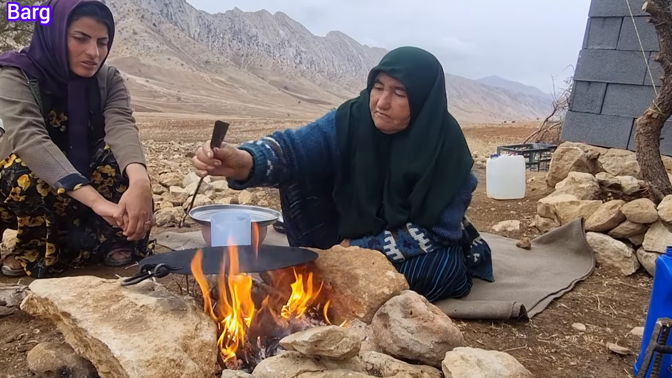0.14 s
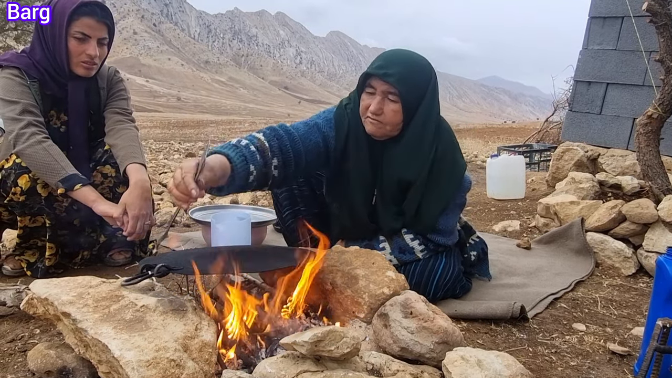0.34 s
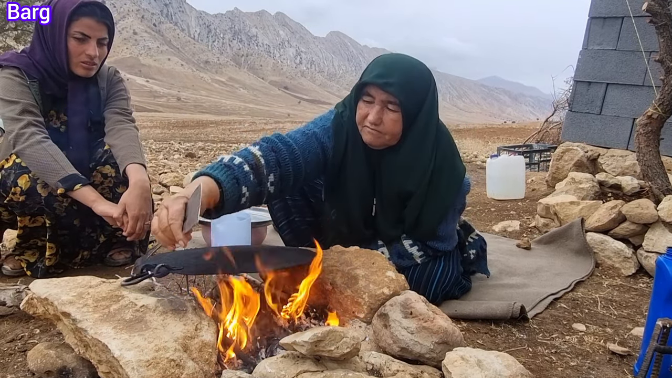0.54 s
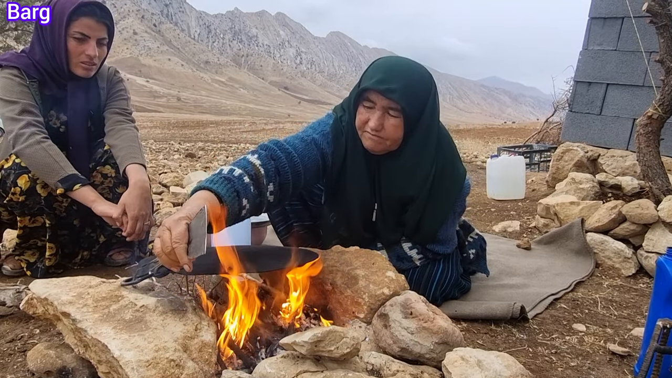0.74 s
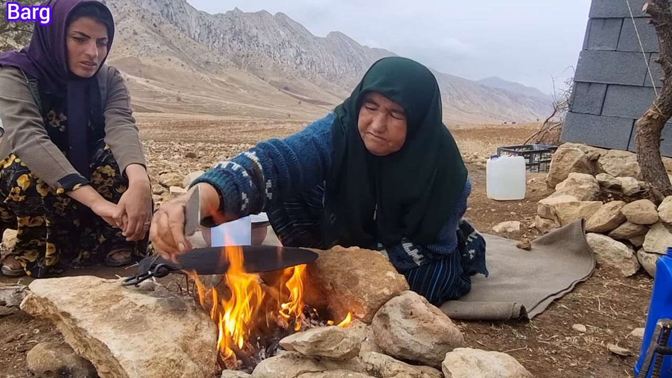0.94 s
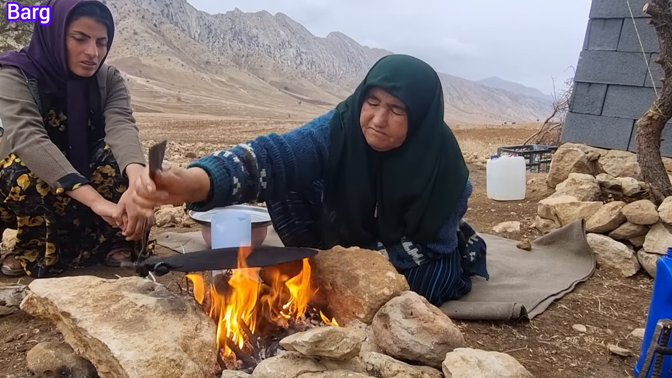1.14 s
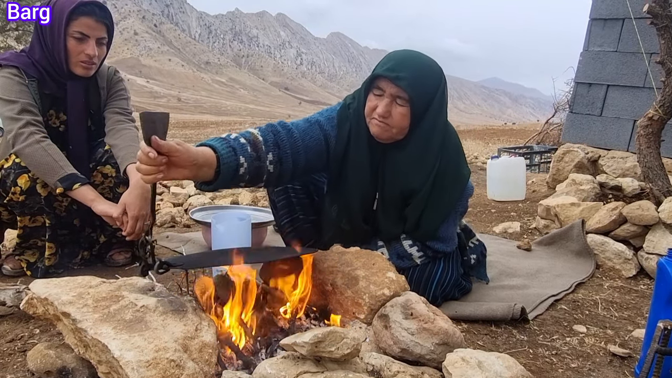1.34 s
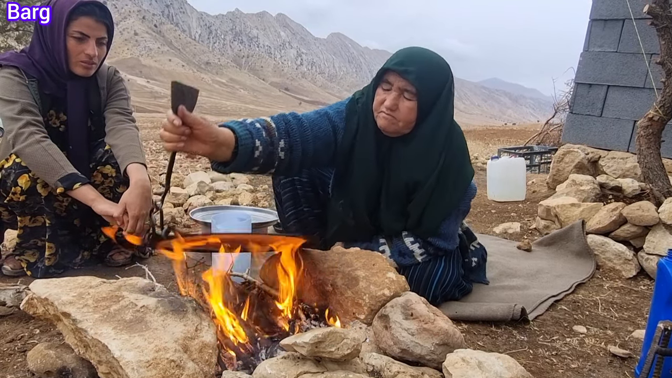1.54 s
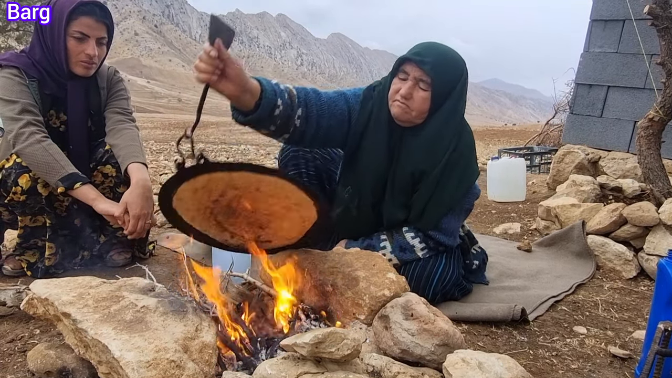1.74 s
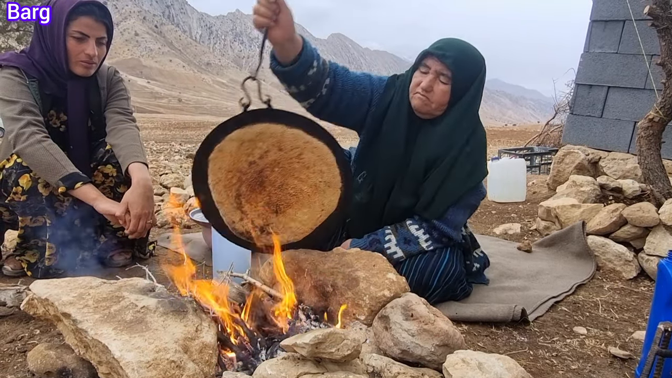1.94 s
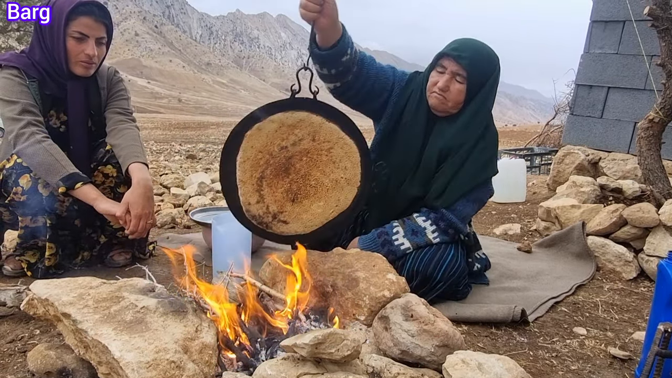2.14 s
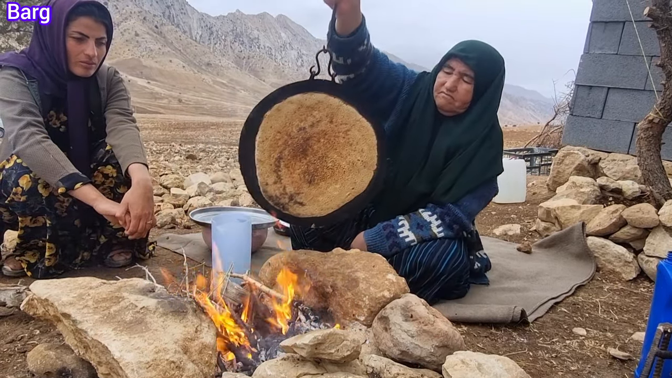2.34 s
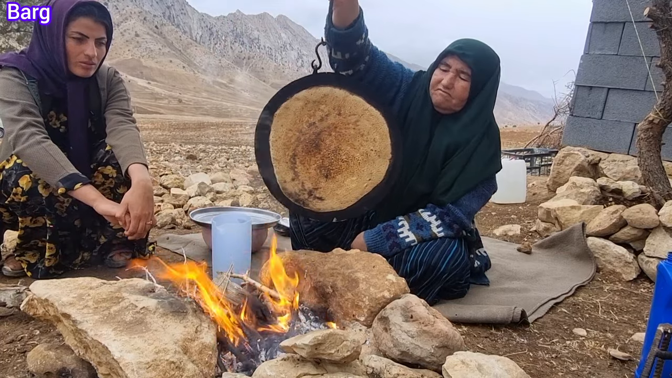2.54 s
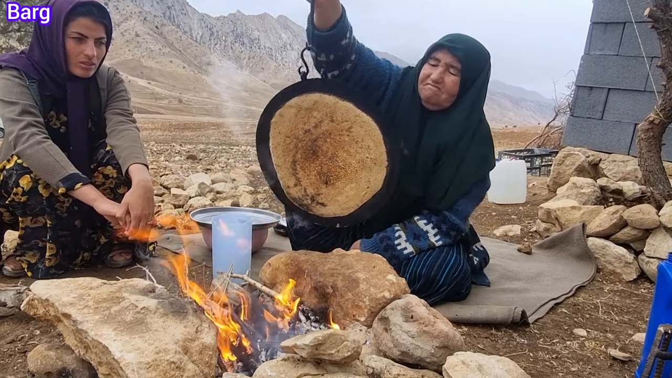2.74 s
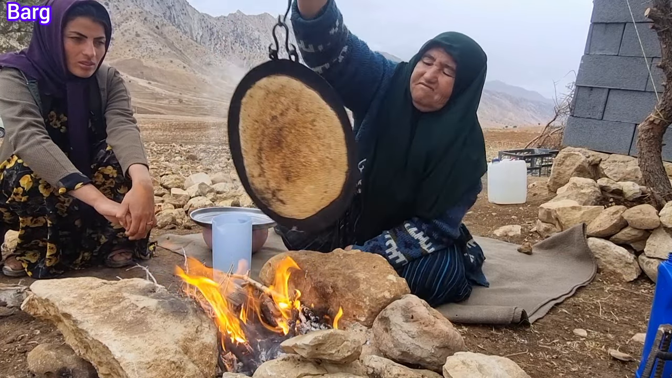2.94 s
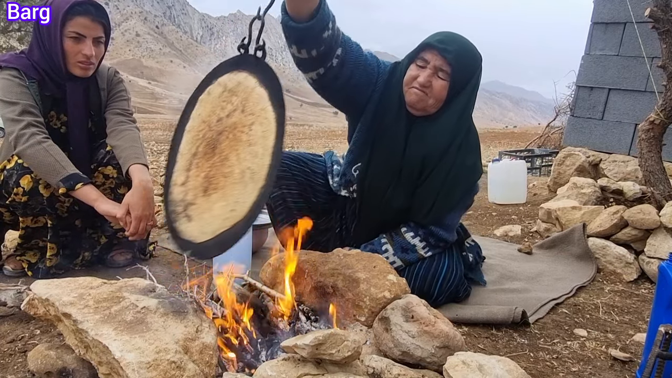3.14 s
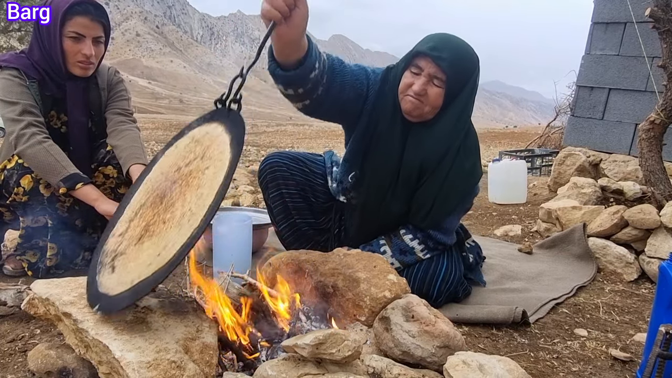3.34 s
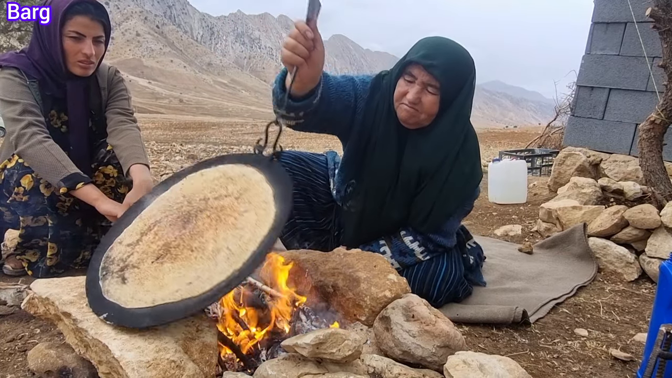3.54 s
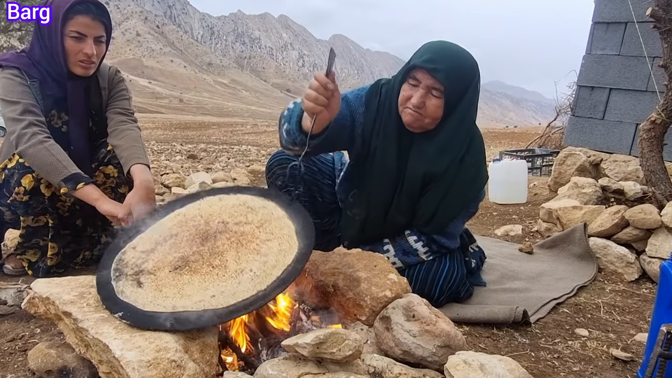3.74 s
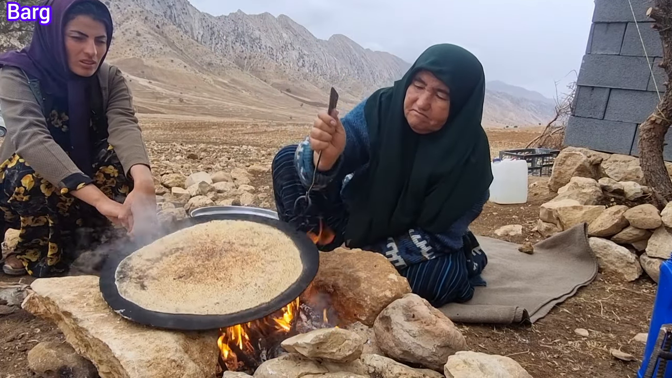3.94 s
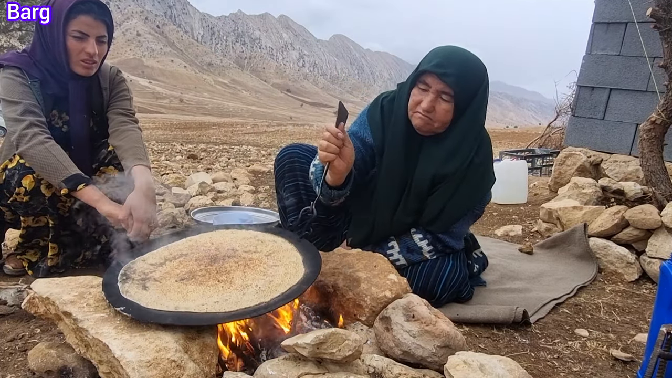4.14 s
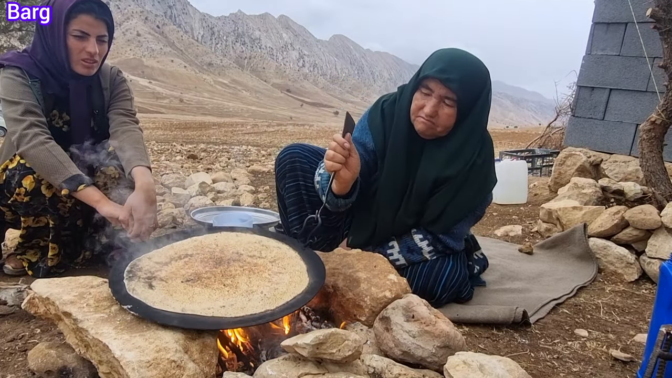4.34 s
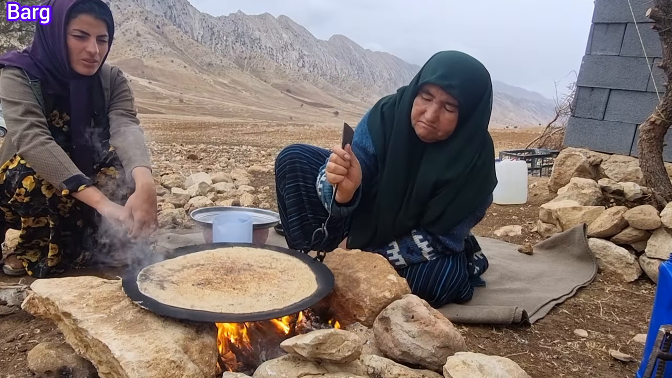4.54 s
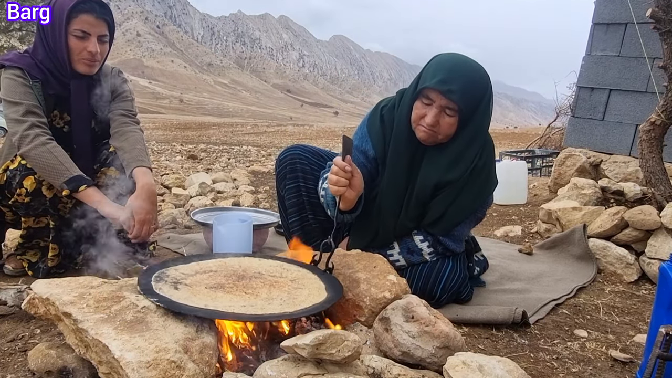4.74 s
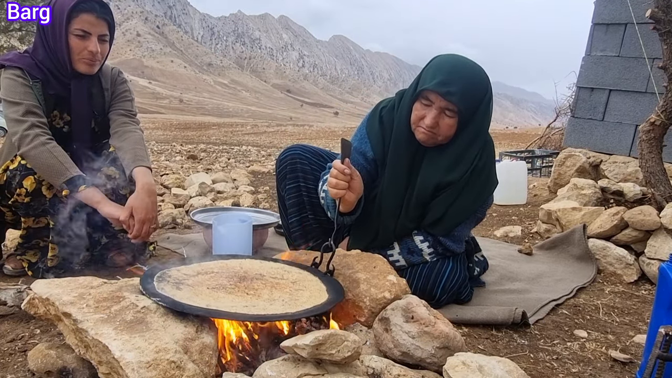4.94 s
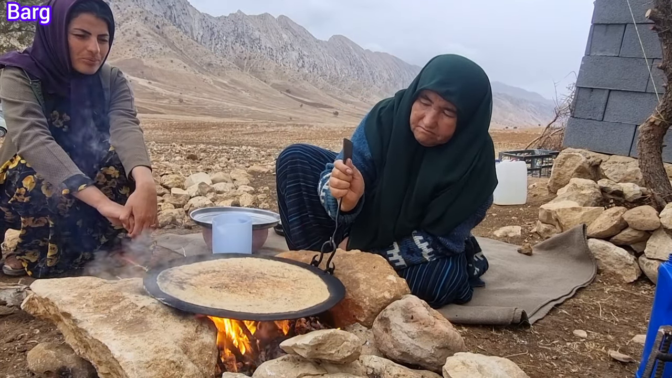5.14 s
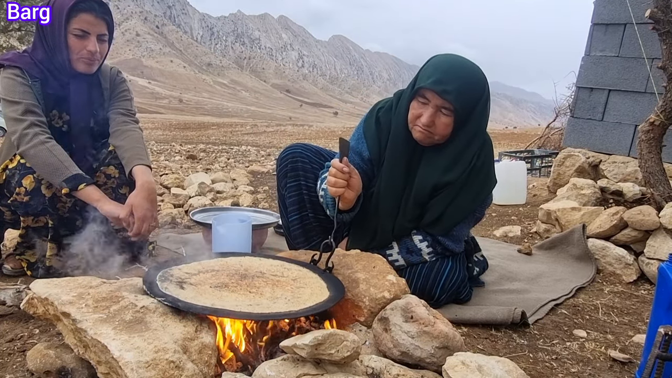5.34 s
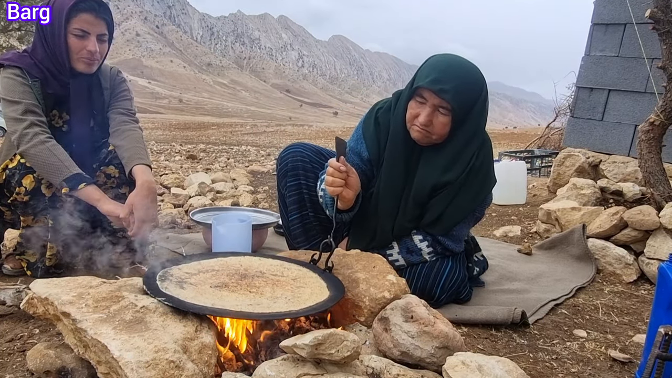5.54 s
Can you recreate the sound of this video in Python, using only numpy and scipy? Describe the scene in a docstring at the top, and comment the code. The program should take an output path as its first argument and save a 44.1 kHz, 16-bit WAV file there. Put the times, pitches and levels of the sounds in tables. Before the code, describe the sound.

A wood fire flutters low and soft throughout, close by and outdoors, over a faint hiss, with a few tiny twig snaps in the first three seconds. At about 0.6 seconds a steel spatula clicks on an iron griddle, then clicks more sharply near 0.95 and rings briefly. Around 1.2 seconds its hooked handle rattles and clinks into the lifting ring. Near 2 seconds the griddle lifts with a light scrape, a clink and a dull knock. Only the fire is heard until 3.4 seconds, when the griddle lands on the hearth stones with several damped clanks and thuds, the loudest moment. It grinds grittily across the stone until about 4 seconds, knocking as it goes. Shorter, quieter scrapes and taps follow from 4.3 to 4.8. A last nudge gives a faint squeak at 5.1, and the griddle rocks and settles with hollow knocks around 5.3 seconds.

```python
"""A wood fire flutters softly outdoors; over it a steel spatula clicks on an iron griddle and twigs snap.
The spatula's hooked handle catches the griddle's ring and lifts it. The griddle, damped by the bread on
it, is set down on the hearth stones, dragged over them and nudged until it settles. Impact and friction
drive the resonances of the one iron plate, heard close to a phone with two microphone ports."""
import sys
import numpy as np
from scipy import signal
from scipy.fft import rfft, irfft
from scipy.io import wavfile
from scipy.ndimage import uniform_filter1d

SR = 44100
rng = np.random.default_rng(int(sys.argv[2]) if len(sys.argv) > 2 else 0)


def generate_wav(signal):
    """Clip the signal to [-1, 1] and save it as 16-bit WAV at the path in sys.argv[1]."""
    frames = np.transpose(np.atleast_2d(signal))
    scaled = np.clip(frames, -1, 1) * 32767
    pcm = np.round(scaled).astype(np.int16)
    wavfile.write(sys.argv[1], SR, pcm)


N = 246959
T = np.arange(N) / SR

# Broad spectra of the sources. Each row: frequency in Hz, relative level in dB.
HISS_SPECTRUM = [(300, -0.5), (600, -11.5), (1000, -7), (1600, -4.5), (2200, -5.5), (3100, -11.5),
                 (4100, 0), (5700, -8.5), (7400, -0.5), (9200, -8), (11000, -3.5), (12800, 0), (15000, -2),
                 (16000, -9)]
FLAME_SPECTRUM = [(13, -35.5), (22, -22.5), (39, -8), (61, 2.5), (90, -1.5), (120, -2), (174, -10.5),
                  (209, -12.5), (285, -16.5), (323, -26.5), (795, -38.5), (900, -39.5), (1170, -84.5),
                  (1980, -120)]
BLADE_SPECTRUM = [(60, 3), (200, -8), (360, -26), (570, 2.5), (740, -11.5), (1100, -6), (1500, -16),
                  (2000, -6), (2800, -4.5), (5500, 5.5), (8700, 4.5), (9300, -16.5), (10500, 2), (16000, 1)]
HOOK_SPECTRUM = [(60, 13.5), (200, 10.5), (360, -11), (550, 6.5), (740, 2), (1150, 5), (1500, -8.5),
                 (2150, 0), (3000, -7), (4200, -6.5), (6200, -1.5), (7500, -5), (8400, -2.5), (9400, -13.5),
                 (12000, -17), (16000, -16)]
RIM_SPECTRUM = [(60, 8), (155, 4.5), (200, 0.5), (350, -8.5), (480, 10.5), (740, 7.5), (1100, 2),
                (1500, -8.5), (2200, -4.5), (3100, -6), (4500, -3), (6500, -4.5), (8400, -7), (9500, -16),
                (12000, -14.5), (16000, -26.5)]
DRAG_SPECTRUM = [(100, -1), (250, -4), (350, -8), (480, 6.5), (740, -3), (1100, -3), (1450, -2.5),
                 (2200, -7), (3100, -5), (4500, -2), (7000, -2.5), (8400, -7), (9500, -9), (12000, -10),
                 (16000, -19.5)]
# Imbalance of the ports. Each row: frequency in Hz, left minus right in dB.
PORT_BALANCE = [(50, 4.5), (200, 2), (500, 2.5), (1100, 5), (1650, 2), (2100, -8.5), (2600, -8.5),
                (3250, 5), (4500, -1), (6500, -4), (8000, -1), (11000, -4), (16000, -4.5)]
# The flames' roar and their flaps, mostly fanned by the plate. Each row: time in seconds, level in dB.
FLAME_LEVELS = [(0.0, -66), (0.39, -68), (0.56, -63.5), (1.39, -62.5), (1.7, -58), (1.87, -58),
                (2.09, -66.5), (2.24, -70), (2.65, -60.5), (3.07, -65.5), (3.62, -54), (3.77, -54.5),
                (3.99, -59.5), (4.76, -63.5), (5.01, -70), (5.24, -86), (5.43, -73.5), (5.6, -69)]
FLAME_FLAPS = [(0.91, -54.5), (1.03, -56.5), (1.47, -60), (1.669, -51), (1.745, -50.5), (2.35, -56.5),
               (3.179, -48.5), (3.23, -53.5), (3.73, -50)]
# Burning twigs. Each row: start in seconds, relative peak in dB, strongest frequency in Hz.
TWIG_SNAPS = [(0.634, -38, 6750), (0.8329, -32, 12400), (1.1337, -47, 7020), (2.119, -31, 12400),
              (2.59, -40.5, 10200)]
# The griddle's modes. Each row: frequency in Hz, bandwidth in Hz, dB above the broad response.
PLATE_MODES = [(265.5, 37, 13.5), (466.3, 24, -0.5), (643, 16, 5.5), (733.5, 19, 8), (829, 15, 4),
               (1000, 35, -2), (1094, 42, 4.5), (1847, 70, 1), (2050, 60, 1.5), (2468, 29, 6.5),
               (3046, 130, 6), (3410, 35, -6.5), (4550, 63, 3.5), (4870, 43, 2.5), (5430, 48, 2.5),
               (6800, 81, -5), (7606, 90, 4)]
# Free modes of the spatula and the lifting ring. Each row: frequency in Hz, level in dB, T60 in seconds.
SPATULA_MODES = [(630, -25, .1), (1095, -1, .045), (1319, -30, .12), (3677, -2, .2), (6481, -16, .09),
                 (8580, -4, .03), (15068, -8, .1)]
RING_MODES = [(1210, 0, .07), (2020, -3, .05), (2420, -1, .045), (3320, -8, .045), (4360, -3, .025),
              (5430, -5, .035)]
# The blade springs off, the ring clinks, the plate's weight shifts. Each row: start in seconds, level in dB.
BLADE_SPRINGS = [(0.957, -27.5)]
RING_CLINKS = [(0.741, -50), (0.767, -57.5), (1.25, -41.5), (1.97, -47)]
WEIGHT_SHIFTS = [(1.92, -42), (1.977, -46), (2.037, -50.5), (3.424, -32.5), (3.515, -37), (3.485, -36.5),
                 (3.722, -45), (4.79, -51.5), (5.198, -41), (5.299, -44.5), (5.335, -50)]
# The domed plate rocks on the hearth. Each row: start in seconds, level in dB, pitch in Hz.
ROCKING_KNOCKS = [(2.033, -36.5, 588), (3.511, -27.5, 727), (3.81, -41.5, 515), (3.842, -38, 682),
                  (5.1988, -39.5, 422), (5.23, -35, 478), (5.318, -36.5, 429), (5.3311, -29.5, 446),
                  (5.343, -31.5, 452)]
# A last nudge squeaks. Each row: start and length in seconds, level in dB, pitch in Hz.
RIM_SQUEAKS = [(5.135, 0.054, -65.5, 3600)]
# Pushes of the griddle. Each row: start and length in seconds, then level, swell and grittiness in dB.
PUSHES = [(1.508, 0.071, -72, 7, 6), (1.676, 0.36, -78.5, 7, 6.5), (1.899, 0.17, -62, 1.5, -5.5),
          (3.174, 0.017, -69, -13.5, -5), (3.293, 0.013, -57.5, -12, -12), (3.556, 0.34, -41.5, -15.5, 0),
          (3.98, 0.033, -69, -3.5, -3), (4.304, .02, -73, 2, 6), (4.35, 0.084, -57, -3.5, -1.5),
          (4.46, 0.14, -55.5, -5, -1), (4.618, 0.037, -58.5, 0, -7.5), (4.679, .16, -50.5, -8.5, -4),
          (5.146, 0.078, -63, 3, -3.5), (5.319, 0.013, -58.5, -4, -1)]
# Blade on iron, hook in ring, rim on stone.
# Each row: start and length in seconds, level in dB, then clank and scratch in dB over that level.
BLADE_CONTACTS = [(0.5525, 0.0018, -46, 2.5, 19), (0.562, .019, -54.5, 3, -2),
                  (0.741, 0.0064, -53, -3.5, -4), (0.9365, .0065, -47.5, 7, 20),
                  (0.949, .0063, -39, 3.5, 14)]
HOOK_CONTACTS = [(1.18, 0.016, -47, -6, -1.5), (1.211, 0.0092, -50, -2, -5), (1.23, .011, -49.5, 5, 8),
                 (1.244, 0.011, -37, 7, 8.5), (1.312, 0.0036, -50.5, 2.5, 4), (1.903, 0.017, -53, -6, 1.5),
                 (1.962, 0.0052, -51.5, 1.5, -2), (1.972, 0.0048, -49, 5, -3.5),
                 (2.034, .0026, -44, -16, -17)]
RIM_CONTACTS = [(3.421, 0.008, -29, 3, 3.5), (3.477, 0.02, -44.5, -9, -12), (3.511, 0.017, -36, -8.5, -9.5),
                (3.565, 0.0065, -39.5, 3, 1), (3.578, 0.0026, -48, 2, 17), (3.768, 0.0046, -41.5, 2.5, 10),
                (3.842, 0.0048, -37, -3, -29), (4.324, 0.0039, -59, -5, -12), (4.599, 0.0088, -51, -4, -28),
                (4.788, 0.0046, -56.5, -9.5, -27), (5.2, 0.0026, -53.5, -4.5, 3.5),
                (5.297, 0.0018, -47.5, -6, 3), (5.333, 0.0026, -44, -12.5, -31)]
# Edges in Hz of a contact's four bands: thud, body, clank, scratch.
CONTACT_EDGES_HZ = [60, 350, 1400, 4200, 16500]


def undb(db):
    """Decibels to amplitude ratio."""
    return 10 ** (np.asarray(db) / 20)


def unit(x):
    """Normalisation to an rms of 1."""
    return x / np.sqrt(np.mean(x ** 2))


def fade(t, t60):
    """Exponential decay from t = 0, by 60 dB in t60 seconds."""
    return np.exp(-np.log(1000) * np.maximum(t, 0) / t60)


def place(x, start):
    """A short sound delayed to its start in seconds."""
    return np.pad(x, (int(start * SR), N))[:N]


def convolve(x, response):
    """Convolution with an impulse response; either may have a row per port."""
    return signal.oaconvolve(np.atleast_2d(x), np.atleast_2d(response), axes=-1)[:, :np.shape(x)[-1]]


def colour(x, spectrum, size=4096):
    """Minimum-phase filter through (Hz, dB) points, by folding the cepstrum."""
    hz, db = np.transpose(spectrum)
    bins_hz = np.maximum(np.fft.rfftfreq(size, 1 / SR), 1)
    gain = undb(np.interp(np.log(bins_hz), np.log(hz), db))
    cepstrum = irfft(np.log(gain))
    cepstrum[1:size // 2] *= 2
    cepstrum[size // 2 + 1:] = 0
    return convolve(x, irfft(np.exp(rfft(cepstrum))))


def band(x, low_hz, high_hz, order=3):
    """Band-pass filter."""
    return signal.sosfilt(signal.butter(order, [low_hz, high_hz], "band", fs=SR, output="sos"), x)


def grit(rate, spread_db, channels=1):
    """Shot noise: tiny collisions of unequal size, on average rate per second."""
    hit = rng.random((channels, N)) < rate / SR
    size = rng.laplace(size=(channels, N))
    return unit(hit * np.sign(size) * undb(spread_db * np.minimum(np.abs(size), 4)))


def wander(rate):
    """Smooth random modulation of rms 1, with rate new values per second."""
    hold = int(SR / rate)
    steps = np.repeat(rng.standard_normal(N // hold + 1), hold)
    return unit(uniform_filter1d(uniform_filter1d(steps, hold), hold)[:N])


def strike(start, modes, rise_s=0.000097, size=16384):
    """Free vibration of a struck body: a sum of damped sinusoids."""
    t = T[:size]
    tone = sum(undb(db) * fade(t, t60) * np.sin(2 * np.pi * hz * t) for hz, db, t60 in modes)
    return place(np.minimum(t / rise_s, 1) * tone, start)


def yard(x, near_db=-7, near_t60=0.026, far_db=-28, far_t60=0.12, size=16384):
    """Reflection: hearth stones scatter the sound at once; wall and ground answer faintly."""
    t = T[:size]
    near = band(rng.standard_normal((2, size)) * fade(t, near_t60), 1800, 16000, order=2)
    far = band(rng.standard_normal((2, size)) * fade(t, far_t60) * (t > .015), 300, 5000, order=1)
    reflections = (undb(near_db) * unit(near) + undb(far_db) * unit(far)) / np.sqrt(size)
    direct = colour(x, [(700, -2.1), (2500, -2.0)])
    return direct + convolve(x, reflections)


def hiss(level_db=-70):
    """Faint stationary noise, uncorrelated at the two ports."""
    return undb(level_db) * unit(colour(rng.standard_normal((2, N)), HISS_SPECTRUM))


def flames(flutter_db=2.5, gain_db=2.66, eddies_db=-17, embers_db=-90, flap_half_s=0.015):
    """Turbulent combustion: flames puff unevenly and flap in the draught; embers crackle faintly."""
    level_db = np.interp(T, *np.transpose(FLAME_LEVELS))
    gas = rng.standard_normal(N) + undb(eddies_db) * rng.standard_normal((2, N))
    roar = unit(colour(gas * undb(flutter_db * wander(35)), FLAME_SPECTRUM))
    flaps = sum(undb(db) * np.exp(-.5 * ((T - time) / flap_half_s) ** 2) for time, db in FLAME_FLAPS)
    embers = unit(band(grit(30, 3), 3500, 13200, order=2))
    draught = unit(colour(rng.standard_normal(N), FLAME_SPECTRUM))
    return undb(level_db + gain_db) * roar + flaps * draught + undb(embers_db) * embers


def twig_snaps(t60=0.0059, gain_db=-1, size=4096):
    """Sudden fracture: each burning twig emits a brief, bright burst of noise."""
    out = 0
    for start, db, hz in TWIG_SNAPS:
        spit = rng.standard_normal(size) * fade(T[:size], t60)
        spit = colour(spit, [(hz / 10, -18), (hz / 4, -16), (hz / 1.9, -3), (hz, 0), (hz * 2, -5)])[0]
        out += undb(db + gain_db) * place(spit / np.abs(spit).max(), start)
    return out


def rim_squeak(width_hz=220, t60=.06):
    """Stick-slip friction at the rim: a narrow band of noise about one high pitch."""
    out = 0
    for start, length, db, hz in RIM_SQUEAKS:
        envelope = (T > start) * fade(T - start - length, t60)
        tone = band(rng.standard_normal(N), hz - width_hz / 2, hz + width_hz / 2, order=2)
        out += undb(db) * envelope * unit(tone)
    return out


def ring_clinks():
    """Impact excites the inharmonic modes of the lifting ring."""
    return sum(undb(db) * strike(start, RING_MODES) for start, db in RING_CLINKS)


def spatula():
    """The thin blade vibrates freely once it springs off the iron."""
    return sum(undb(db) * strike(start, SPATULA_MODES) for start, db in BLADE_SPRINGS)


def griddle(spectrum, vary_db=0, size=8192):
    """The plate's impulse response: a click plus damped modes; vary_db shifts the spot touched."""
    t = T[:size]
    spot_db = vary_db * rng.standard_normal(len(PLATE_MODES))
    response = 0
    for (hz, width_hz, db), offset_db in zip(PLATE_MODES, spot_db):
        damping = np.pi * width_hz
        amplitude = undb(db + offset_db) * 2 * damping / SR
        response += amplitude * np.exp(-damping * t) * np.cos(2 * np.pi * hz * t)
    response[0] += 1
    return colour(response, spectrum)


def thumps(t60=0.16, rise_s=0.0052, gain_db=-3, size=8192):
    """Forced vibration: the plate's shifting weight sends a dull thud through the hearth."""
    t = T[:size]
    press = np.minimum(t / rise_s, 1) * fade(t, t60)
    force = sum(undb(db) * place(press, start) for start, db in WEIGHT_SHIFTS)
    response = band(griddle(RIM_SPECTRUM), 55, 320)
    return undb(gain_db) * convolve(force * rng.standard_normal(N), response / np.linalg.norm(response))


def rocking(t60=0.048, rise_s=0.002, overtone_ratio=1.8, overtone_db=-12):
    """Soft impacts give hollow knocks; the point of support on the stones sets their pitch."""
    return sum(undb(db) * strike(start, [(hz, 0, t60), (hz * overtone_ratio, overtone_db, t60)], rise_s)
               for start, db, hz in ROCKING_KNOCKS)


def grind(judder, rate, spread_db, channels=1, vary_db=4, shift_db=5, spots=4):
    """Mode strength depends on the driving point, so the timbre shifts as it wanders along the rim."""
    shares = undb(shift_db * np.array([wander(16) for _ in range(spots)]))
    shares /= np.linalg.norm(shares, axis=0)
    return sum(convolve(share * judder * grit(rate, spread_db, channels), griddle(DRAG_SPECTRUM, vary_db))
               for share in shares)


def drag(attack_s=0.039, t60=.27, judder_db=1.5, catch_db=1.76, bumps_db=-2, sand_db=-4, rumble_db=-7):
    """Sliding friction on stone: bumps shake the juddering plate, sand crunches, the hearth rumbles."""
    effort, crunch = 0, 0
    for start, length, db, swell_db, gritty_db in PUSHES:
        t = T - start
        attack = np.clip(1 + t / attack_s, 0, 1) ** 2
        swell = undb(swell_db * np.clip(t / length, 0, 1))
        push = undb(db) * attack * swell * fade(t - length, t60)
        effort += push
        crunch += undb(gritty_db) * push
    judder = unit(undb(judder_db * wander(220) + catch_db * wander(55)))
    shaking = grind(judder, rate=600, spread_db=3.1)
    bumps = undb(bumps_db) * unit(band(shaking, 180, 1700))
    rumble = undb(rumble_db) * unit(band(shaking, 50, 260))
    grains = grind(judder, rate=1100, spread_db=3.4, channels=2)
    sand = undb(sand_db) * unit(band(grains, 1300, 16000))
    return effort * (bumps + rumble) + crunch * sand


def contacts(table, spectrum, t60s, rise_s, rate, spread_db, gain_db, thud_db):
    """Contact chatter drives the plate in four bands and decays soonest in the treble."""
    plate, out = griddle(spectrum), 0
    # Long waves reach both ports alike; short ones differ.
    alike, unlike = grit(rate, spread_db), grit(rate, spread_db, channels=2)
    for k, (t60, chatter) in enumerate(zip(t60s, [alike, alike, unlike, unlike])):
        force = np.zeros_like(chatter)
        for start, length, db, clank_db, scratch_db in table:
            span = slice(int((start - rise_s) * SR), int((start + .5) * SR))
            t = T[span] - start
            press = np.clip(1 + t / rise_s, 0, 1) ** 2 * fade(t - length, t60)
            slips = unit(press * chatter[:, span]) * np.sqrt(np.mean(press ** 2))
            # An edge clanks and scratches more than a flat face.
            band_db = [thud_db, 0, clank_db, scratch_db][k]
            force[:, span] += undb(db + band_db) * slips
        response = band(plate, CONTACT_EDGES_HZ[k], CONTACT_EDGES_HZ[k + 1])
        out = out + convolve(force, response / np.linalg.norm(response))
    return undb(gain_db) * out


def ports(sound, lag_samples=7):
    """Path difference: sound reaches the nearer, left port first, and each port colours it."""
    left, right = sound
    right = np.pad(right, (lag_samples, 0))[:N]
    return np.vstack([colour(left, [(hz, db / 2) for hz, db in PORT_BALANCE]),
                      colour(right, [(hz, -db / 2) for hz, db in PORT_BALANCE])])


def scene():
    """Superposition of fire, spatula and griddle at the two ports, over the hiss."""
    blade = contacts(BLADE_CONTACTS, BLADE_SPECTRUM, t60s=[0.091, 0.094, 0.078, 0.031],
                     rise_s=0.0012, rate=7000, spread_db=1, gain_db=-1.5, thud_db=-8)
    hook = contacts(HOOK_CONTACTS, HOOK_SPECTRUM, t60s=[0.12, 0.09, 0.056, 0.043],
                    rise_s=0.0029, rate=5000, spread_db=2, gain_db=-0.97, thud_db=-9.5)
    rim = contacts(RIM_CONTACTS, RIM_SPECTRUM, t60s=[0.12, 0.083, 0.068, 0.023],
                   rise_s=0.004, rate=4200, spread_db=3.5, gain_db=-0.6, thud_db=-8)
    with_reflections = yard(blade + hook + rim + drag() + rim_squeak() + twig_snaps())
    direct_only = spatula() + ring_clinks() + rocking() + thumps() + flames()
    return ports(with_reflections + direct_only) + hiss()


def record(dry, cutoff_hz=16200):
    """Band limiting: the phone's steep low-pass filter removes the highest treble."""
    return signal.sosfilt(signal.ellip(8, .2, 70, cutoff_hz, fs=SR, output="sos"), dry)


dry = scene()
out = record(dry)
generate_wav(out)
```